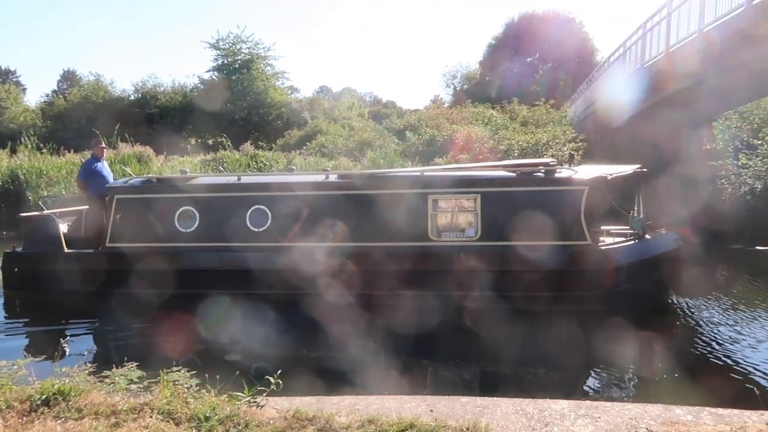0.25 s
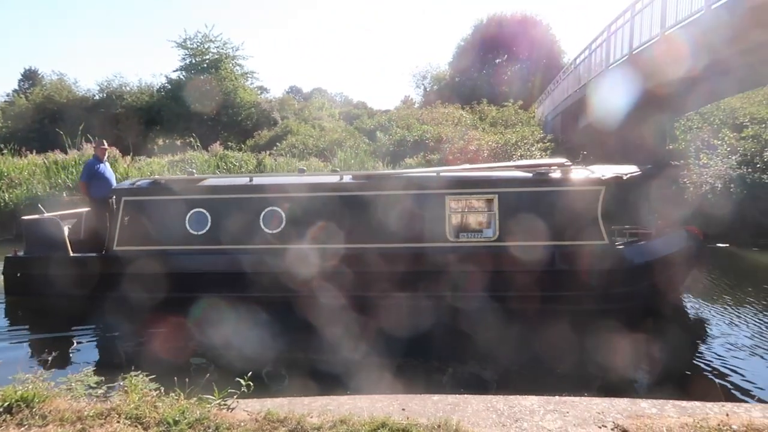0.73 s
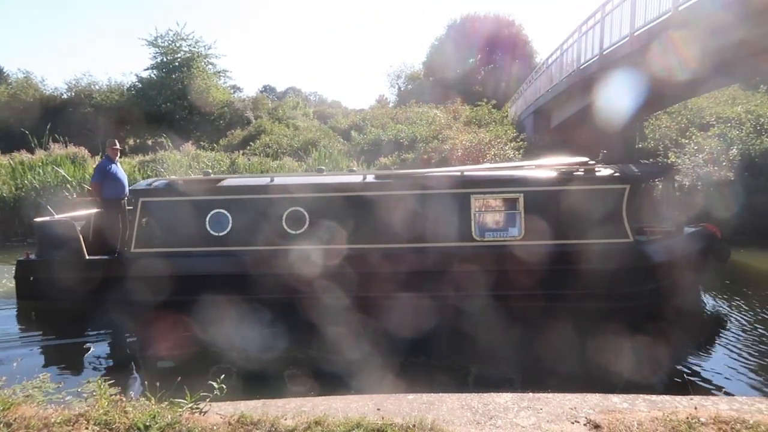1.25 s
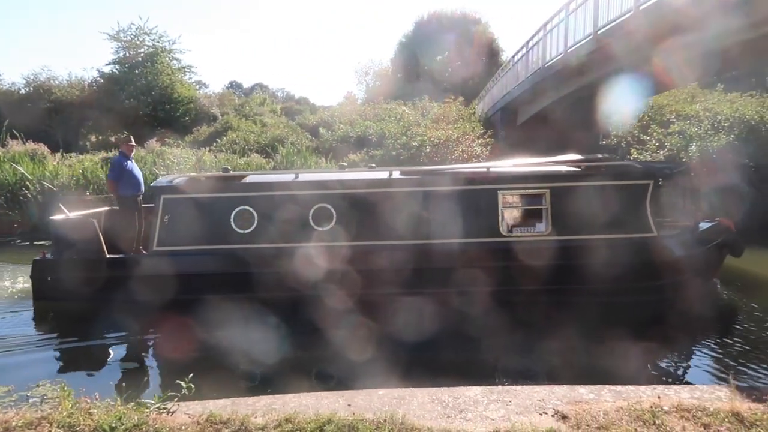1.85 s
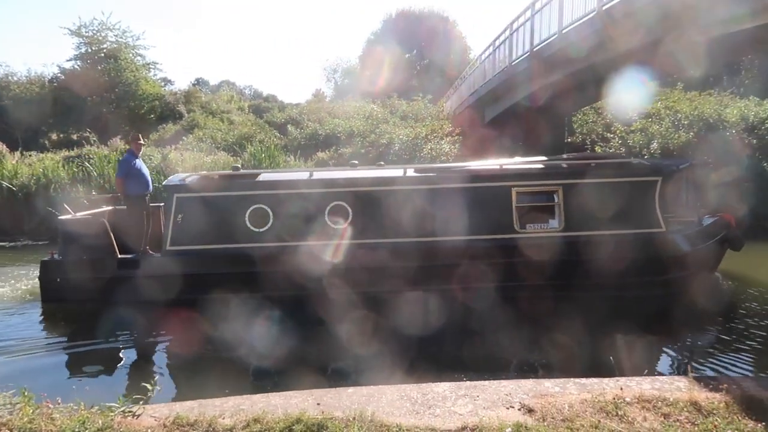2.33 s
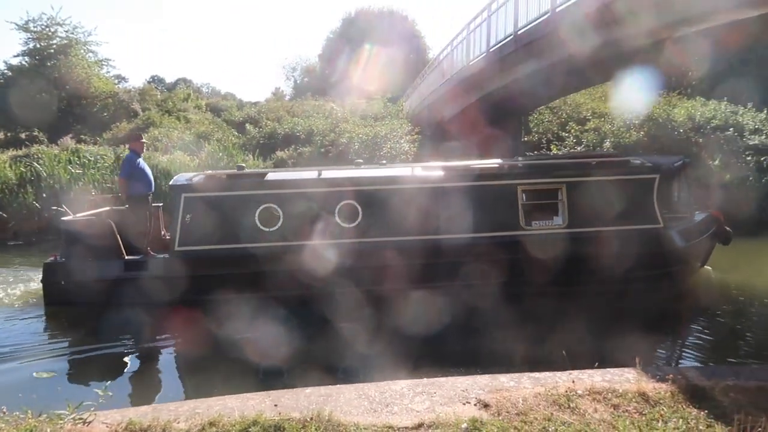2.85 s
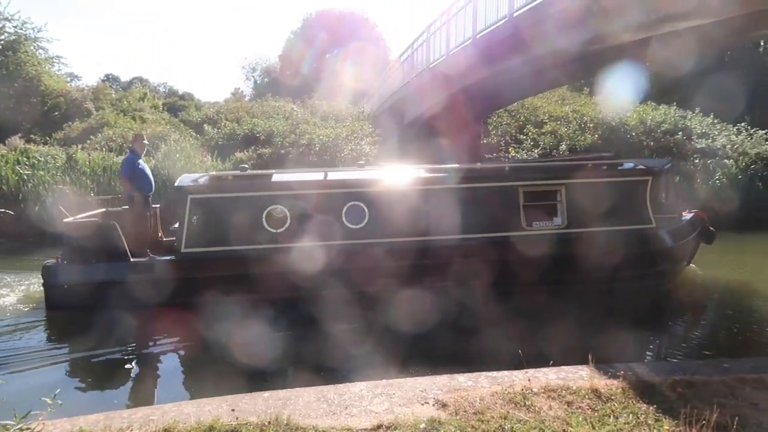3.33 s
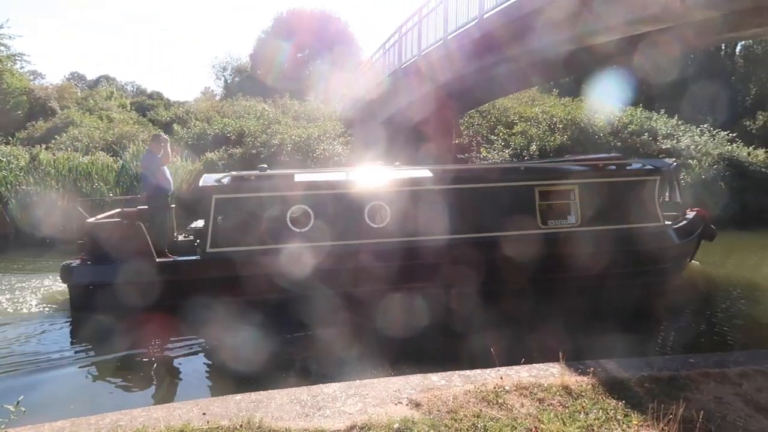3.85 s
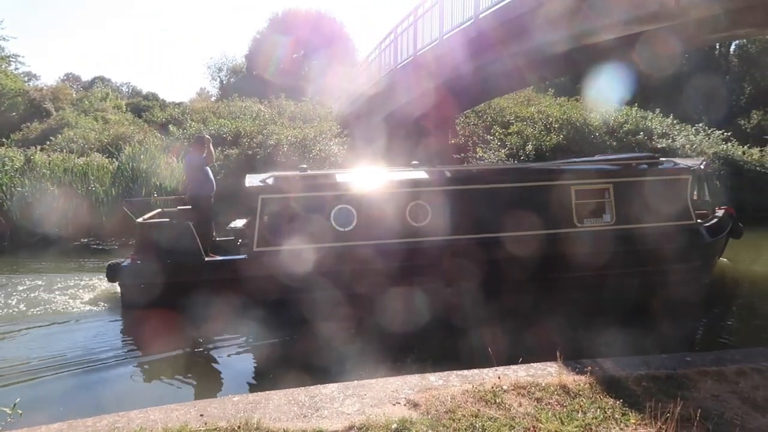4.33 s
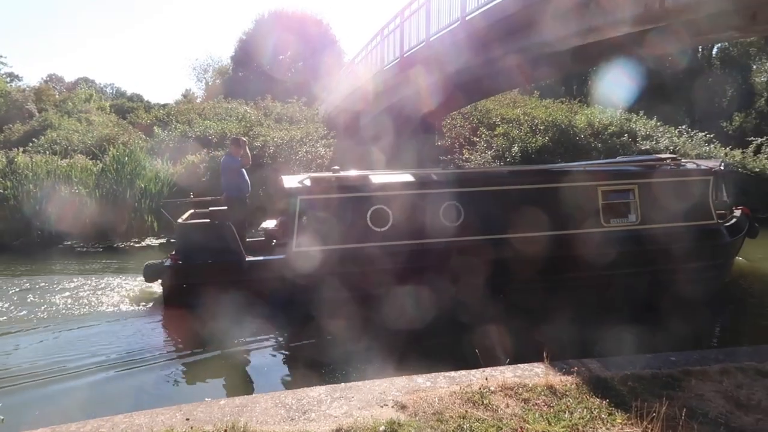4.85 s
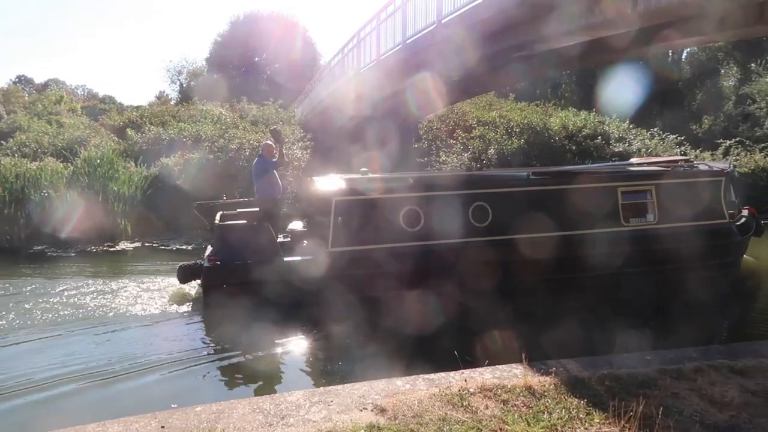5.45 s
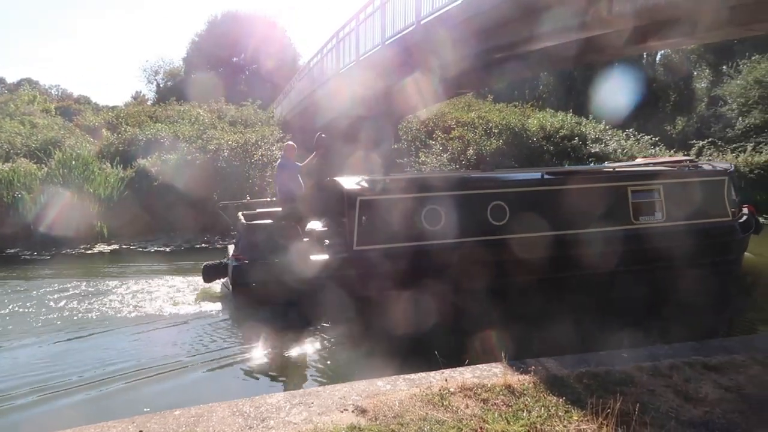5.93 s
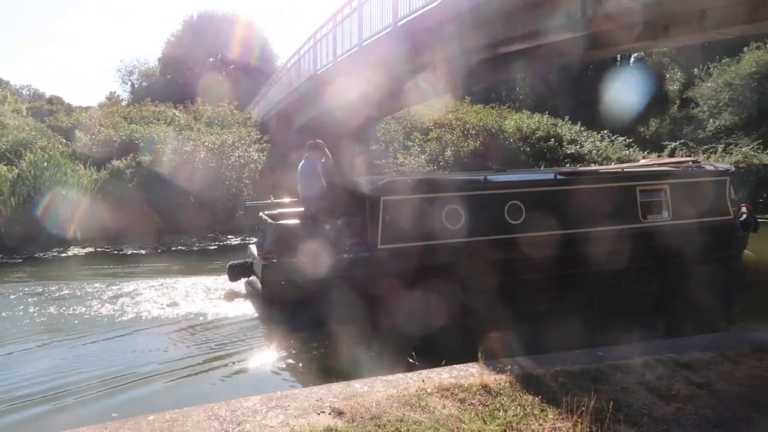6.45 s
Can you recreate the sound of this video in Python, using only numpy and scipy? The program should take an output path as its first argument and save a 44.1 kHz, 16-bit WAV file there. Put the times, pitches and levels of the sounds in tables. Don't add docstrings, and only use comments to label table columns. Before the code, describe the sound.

Outdoors beside a canal, a low diesel putter runs continuously, about fourteen cycles a second, growing slightly louder as the boat's stern comes nearer. Its hull rattles and rings with every cycle. Behind it propeller wash hisses faintly, dotted with bubbling plops and sharp little drops. Handheld camera microphones add light mechanical ticking and a barely audible high whine.

```python
import sys
import numpy as np
from scipy import signal
from scipy.fft import rfft, irfft, next_fast_len
from scipy.io import wavfile
from scipy.ndimage import uniform_filter1d, map_coordinates

SR = 44100
rng = np.random.default_rng(int(sys.argv[2]) if len(sys.argv) > 2 else 0)


def persist_wave(psi):
    counts = np.round(np.clip(psi, -1, 1) * 32767).astype(np.int16)
    wavfile.write(sys.argv[1], SR, np.atleast_2d(counts).T)


def decibels_to_gain(level_db):
    exponent = np.asarray(level_db, float) / 20
    return 10 ** exponent


N = 294588

# (t/s, engine cycles/Hz)
SPEED = [(0, 14.481), (.4, 14.504), (.65, 14.597), (.95, 14.713), (1.15, 14.687), (1.7, 14.484),
         (2.2, 14.393), (2.7, 14.36), (3.1, 14.422), (3.5, 14.458), (3.9, 14.601), (4.25, 14.65),
         (4.8, 14.484), (5.1, 14.47), (5.5, 14.359), (5.9, 14.352), (6.68, 14.432)]


def unit(x):
    return x / np.sqrt(np.mean(x ** 2) + 1e-20)


def curves(rows):
    s, *cols = np.transpose(rows)
    return [np.interp(np.arange(N) / SR, s, c) for c in cols]


def wobble(rate):
    coarse = np.arange(0, N + 16, 16)
    knots = rng.standard_normal(int(N * rate / SR) + 4)
    smooth = map_coordinates(knots, [coarse * rate / SR])
    return np.interp(np.arange(N), coarse, smooth)


def coloured(x, spectrum):
    m = next_fast_len(N + 8192)
    f, db = np.transpose(spectrum)
    gain = decibels_to_gain(np.interp(np.log(np.fft.rfftfreq(m, 1 / SR) + 1), np.log(f + 1), db))
    return unit(irfft(rfft(x, m) * gain, m)[..., :N])


def patchy(channels, depth_db, wide, long):
    z = signal.stft(rng.standard_normal((channels, N)), nperseg=512)[2]
    field = uniform_filter1d(rng.standard_normal(z.shape[1:]), int(wide), 0)
    field = uniform_filter1d(field, int(long), 1)
    return signal.istft(z * decibels_to_gain(depth_db * unit(field)), nperseg=512)[1][:, :N]


def pings(s, peak_db, hz, t60, attack, rise=0):
    t = np.arange(SR // 15) / SR
    s, peak_db, hz, t60 = (np.reshape(v, (-1, 1)) for v in np.broadcast_arrays(s, peak_db, hz, t60))
    shape = decibels_to_gain(peak_db - 60 * t / t60) * (1 - np.exp(-t / attack))
    wave = shape * np.sin(2 * np.pi * hz * t * (1 + rise * t / t60))
    at = np.round(s * SR).astype(int) + np.arange(len(t))
    return np.bincount(at.ravel(), wave.ravel(), N + SR)[:N]


def electronics_whine():
    # (f/Hz, rms level/dB)
    whines = [(13000, -90), (13025, -91)]
    phase = 2 * np.pi * np.arange(N) / SR
    side = np.array([[.6], [-.6]])
    return sum(decibels_to_gain(db + 3) * np.sin(hz * phase + .6 * wobble(9) + side) for hz, db in whines)


def lens_drive():
    # (first step t/s, number of steps, peak level/dB)
    runs = [(.009, 1, -46), (.0355, 1, -42), (.0893, 2, -45), (.1056, 2, -43), (.249, 1, -44),
            (.3055, 1, -45), (.3291, 1, -45), (.4256, 1, -43), (.4955, 2, -41), (.5291, 5, -40),
            (.5855, 2, -41), (.6556, 1, -39), (5.3054, 1, -42), (5.329, 1, -39), (5.3559, 1, -41),
            (5.4796, 1, -44), (5.5455, 2, -42), (5.569, 2, -43), (5.658, 4, -42), (5.689, 4, -43),
            (5.8981, 1, -40), (5.9291, 3, -42), (5.948, 1, -41), (6.0254, 2, -42), (6.089, 1, -41),
            (6.103, 2, -42), (6.2629, 1, -43), (6.3129, 1, -44), (6.3832, 1, -43)]
    frame_s, scatter_db = .04, 1.5
    s, db = np.transpose([(first + frame_s * k, db) for first, steps, db in runs for k in range(steps)])
    db = db + scatter_db * rng.standard_normal(len(s))
    hz = 4250 * (1 + .02 * rng.standard_normal(len(s)))
    ring = pings(s - .0009, db + 9, hz, t60=.01, attack=.0008)
    ring += pings(s - .0009, db - 1, 3500, t60=.014, attack=.0008)
    return ring * [[1.06], [-.94]]


def splashes():
    # (t/s, peak level/dB, f/Hz, t60/s)
    bubbles = [(2.929, -25, 910, 0.02), (4.472, -19, 900, .02), (2.9, -25, 850, .02),
               (3.048, -26, 820, .025), (2.58, -27, 1240, 0.023), (3.1674, -37, 1460, 0.019),
               (3.4241, -35.5, 1270, 0.03), (3.5828, -32, 1280, 0.038), (3.7883, -34, 1330, 0.02),
               (4.0845, -39, 1950, 0.03), (4.5835, -33.5, 2040, 0.053), (4.668, -28, 1247, 0.044),
               (5.091, -34, 1230, 0.03), (5.3687, -31, 1347, 0.08), (5.5393, -32, 1780, 0.037),
               (5.8555, -28.5, 1810, 0.04), (5.8905, -37, 1630, 0.045), (5.9559, -36, 1860, 0.042)]
    # (t/s, peak level/dB, f/Hz, left-right difference/dB)
    snaps = [(2.8354, -50, 8300, -3), (4.0526, -36.5, 3300, 2), (5.1824, -31, 4700, -3.5),
             (5.1824, -47.5, 8300, 0), (5.3052, -46, 3520, -2), (5.4194, -49, 10500, 7),
             (6.027, -48, 5470, -1), (6.19, -47, 5600, -2), (6.272, -42, 3800, 0), (6.5125, -40, 3200, -3),
             (6.539, -49, 7600, -4)]
    s, db, hz, t60 = np.transpose(bubbles)
    plops = pings(s, db + 1, hz, t60, attack=.003, rise=.04)
    s, db, hz, pan_db = np.transpose(snaps)
    left, right = [
        pings(s, db + 10.5 + side * pan_db / 2, hz, t60=0.0027, attack=.0002)
        for side in (0.85, -1)
    ]
    return plops + np.array([left, right])


def wash():
    # (f/Hz, level/dB)
    water = [(40, -51), (150, -21.5), (400, -20), (1000, -30), (2000, -32.5), (3600, -40.5), (4400, -39),
             (6300, -43), (8000, -47.5), (10000, -52), (13000, -62.5), (15000, -74)]
    drops = rng.random((2, N)) < 90 / SR
    spray = drops * decibels_to_gain(4 * np.clip(rng.standard_normal((2, N)), -3, 1.8))
    near, wide = patchy(2, depth_db=2.5, wide=3, long=9) + 0.27 * unit(spray)
    churn = np.array([near + 0.8 * wide, near - 0.7 * wide])
    return coloured(churn * decibels_to_gain(0.41 * wobble(7)), water)


def valve_gear(cycle, clatter_db):
    # (share of the cycle, f/Hz, t60/s, level over the clatter/dB, facing the microphone t/s)
    parts = [(0.363, 2150, 0.099, 1, 0.89), (.68, 2190, 0.075, -2.5, 1.3), (.22, 3100, .04, -1.5, 2.7),
             (.22, 1900, .045, 3, 3.3), (0.99, 1850, 0.056, -1.5, 2.6), (.33, 2950, 0.039, 0, 5),
             (.59, 2950, .088, -5.5, 3.2), (.42, 930, .049, 5.5, 4), (0.7, 960, 0.14, 4, 3.5),
             (.87, 1110, 0.06, 6, 3.1), (.93, 1390, 0.084, 3, 3.3), (.23, 3900, 0.068, -8.5, 6),
             (0.52, 4100, .032, -10, 6.6), (.46, 5420, 0.042, -13.5, 5.3), (.77, 5420, 0.054, -14, 5.8),
             (.3, 7100, .054, -15, 6.3), (0.0497, 715, 0.089, 3, 4.8), (.4, 2280, .07, -2, .8)]
    shade_db_per_s = 1.5
    turns = np.arange(-1, int(cycle[-1]) + 1)
    out = np.zeros(N)
    for at, hz, t60, db, facing_s in parts:
        late, strength, pitch = rng.standard_normal((len(turns), 3)).T
        sample = np.interp(turns + at + .012 * late, cycle, np.arange(N))
        shade_db = shade_db_per_s * np.abs(sample / SR - facing_s)
        level_db = db - shade_db + clatter_db[sample.astype(int)] + 1.3 * strength
        ring = pings(sample[1:] / SR, level_db[1:], hz * (1 + .01 * pitch[1:]), t60, attack=.0025)
        out += ring * (.8 + .5 * wobble(40 + .05 * hz))
    return out


def clatter(cycle):
    # (share of the cycle, level/dB)
    knocks = [
        (.15, -8.5),
        (.4, -7),
        (.72, -6),
        (.9, 13.5),
    ]
    # (f/Hz, level/dB)
    hull_bow = [(320, -35), (540, -7.5), (572, -9), (727, -0.5), (810, -4.5), (902, -2), (980, -4),
                (1170, -5.5), (1510, -14), (1600, -12), (1840, -11.5), (2220, -12), (2690, -20),
                (3900, -24), (5070, -50.5), (8580, -120)]
    # (f/Hz, level/dB)
    hull_stern = [(320, -38.5), (540, -9.5), (686, 1.5), (894, 0.5), (1200, -4.5), (1400, -8.5),
                  (1560, -18), (1650, -7.5), (1820, -5.5), (2240, -17), (2850, -13), (3220, -19.5),
                  (3500, -15.5), (3900, -24), (5070, -48.5), (8580, -120)]
    beat_db = 1.0 * np.cos(2 * np.pi * (cycle - .55))
    timed = sum(decibels_to_gain(db) * np.diff(np.floor(cycle - at + .004 * wobble(15)), prepend=-1) for at, db in knocks)
    loose = (rng.random(N) < 300 / SR) * decibels_to_gain(2.5 * np.clip(rng.standard_normal(N), -3, 2))
    blows = 0.19 * unit(timed * decibels_to_gain(2.0 * wobble(40))) + 0.28 * unit(loose)
    rattle = patchy(1, depth_db=1.6, wide=2, long=10)[0] + blows
    rattle = rattle * decibels_to_gain(beat_db + .3 * wobble(8))
    turn = np.interp(np.arange(N) / SR, [1.2, 5.4], [0, 1])
    return (1 - turn) * coloured(rattle, hull_bow) + turn * coloured(rattle, hull_stern)


def exhaust_drone():
    # (f/Hz, level/dB)
    drone = [(20, -28.5), (50, -8), (110, -4), (180, -3), (240, -6.5), (330, -12.5), (480, -13.5),
             (560, -23), (800, -68)]
    return coloured(rng.standard_normal(N), drone)


def order_levels(t):
    stations = [.6, 3.7, 6.3]
    # (bow level/dB, side level/dB, stern level/dB)
    pipe_orders = [(-34, -48, -40), (-27.5, -28, -31.5), (-17.5, -16, -16), (-8, -8.5, -12), (-2.5, -4, -3),
                   (-15, -5, -9.5), (-4.5, -0.5, -1), (-0.5, -0.5, 2.5), (-17.5, -12.5, -10),
                   (-12, -13.5, -12), (-14.5, -10, -7), (-9.5, -3, -8), (-16.5, -15.5, -13.5)]
    # (level/dB, plate facing the microphone t/s, fading away from it/dB per s)
    hull_orders = [(-19.5, 4.5, 2), (-17.5, 4.0, 2), (-22.5, 3, 0.5), (-20, 6.5, 0.5), (-23.5, 7, 0),
                   (-19, 2, 3.0), (-33.5, 0.0, 2), (-21, 3.6, 2.5), (-24, 4.5, 1), (-31, 1.5, 3.5),
                   (-26.5, 0.5, 0.5), (-22, 4.0, 3.5), (-34.5, 3, -1), (-21, 4, 4), (-28.5, 8.5, 1),
                   (-30, 0.0, -0.5), (-26.5, 3.5, 4), (-27, 4, 0.5), (-26.5, 8, 1), (-22, 4.5, 2),
                   (-28.5, 6.5, 1.0)]
    # (order, t/s, loss/dB, half width/s)
    nulls = [(11, 5.1, 9, .4), (12, 4.1, 3, .4), (13, 1.9, 13, .7), (13, 4.85, 14, .3), (17, 2.3, 15, .5)]
    levels = [np.polyval(np.polyfit(stations, sides_db, 2), t) for sides_db in pipe_orders]
    levels += [db - shade * np.abs(t - facing_s) for db, facing_s, shade in hull_orders]
    for k, s, loss_db, half in nulls:
        levels[k - 1] = levels[k - 1] - loss_db * np.exp(-((t - s) / half) ** 2)
    return levels


def exhaust(cycle):
    firings = [
        (.522, 1),
        (.909, .891),
    ]
    # (f/Hz, width/Hz)
    pipe_modes = [(71.4, 11.9), (139.8, 29.8), (141.4, 4), (160.4, 4)]
    t, out = np.arange(N) / SR, np.zeros(N)
    mean_hz = np.mean(SPEED, axis=0)[1]
    for k, heard_db in enumerate(order_levels(t), 1):
        hz = k * mean_hz
        firing = sum(size * np.exp(-2j * np.pi * k * at) for at, size in firings)
        pipe = np.prod([-1 / (c * c - hz * hz + 1j * hz * w) for c, w in pipe_modes])
        shaky = np.clip((k - 9) / 12, .04, 1)
        level_db = heard_db + 1.5 * shaky * wobble(2)
        scattered = 2 * np.pi * rng.random() * (k > 13)
        phase = np.angle(firing * pipe) + scattered + .25 * shaky * wobble(1.5)
        out += decibels_to_gain(level_db) * np.cos(2 * np.pi * k * cycle + phase)
    return out / np.sqrt(np.abs(uniform_filter1d(out ** 2, SR // 2)) + 1e-9)


def placed(x):
    # (t/s, lead of the left/s)
    left_leads = [(0, 2.4e-5), (4.2, 2e-5), (5.2, .4e-5), (6.68, 0)]
    shift = curves(left_leads)[0] * SR / 2 * np.gradient(x)
    return np.array([x + shift, x - shift])


def scene():
    # (t/s, nearness/dB)
    passing = [(0, -1.5), (.7, -.5), (1.2, -.5), (2.4, -1), (3.2, 0), (4.3, 1), (5.1, 1), (6.2, 1.5),
               (6.68, 2)]
    cycle = np.cumsum(curves(SPEED)[0]) / SR
    near_db, = curves(passing)
    exhaust_db = -23.5 + near_db
    clatter_db = -42.5 + 1.11 * near_db
    wash_db = -64.5 + 0.56 * near_db
    wash_db += np.interp(np.arange(N) / SR, (4.2, 4.3), [0, 0.5])
    whine, ticks, drops = electronics_whine(), lens_drive(), splashes()
    wake = decibels_to_gain(wash_db + 17) * wash()
    struck = valve_gear(cycle, clatter_db)
    block = decibels_to_gain(clatter_db) * clatter(cycle)
    pipe = decibels_to_gain(exhaust_db) * (exhaust(cycle) + decibels_to_gain(-19.5) * exhaust_drone())
    return placed(pipe + block + struck) + wake + drops + ticks + whine


def band_limit(x):
    return signal.sosfilt(signal.butter(12, 14880, fs=SR, output="sos"), x)


def record(dry):
    return band_limit(dry)


dry = scene()
out = record(dry)
persist_wave(out)
```